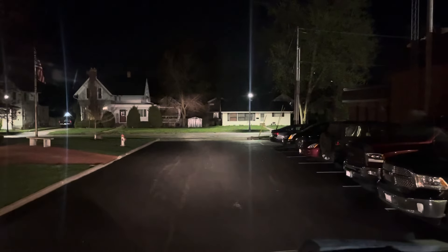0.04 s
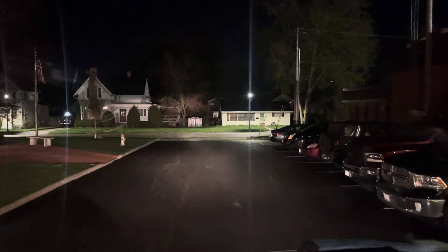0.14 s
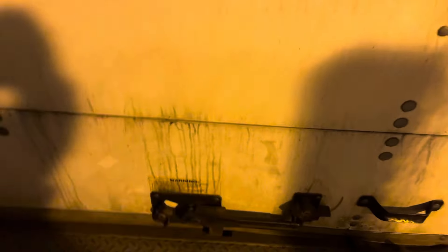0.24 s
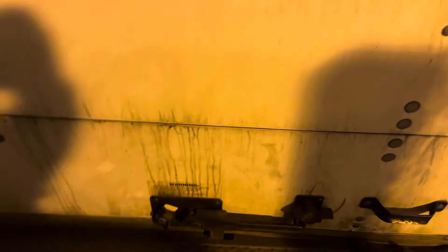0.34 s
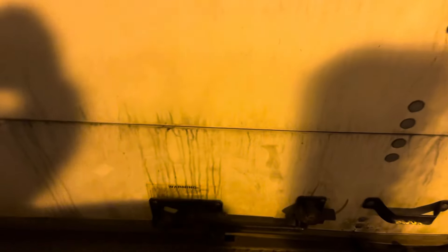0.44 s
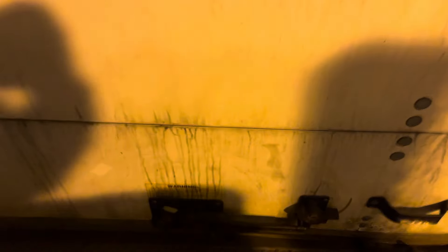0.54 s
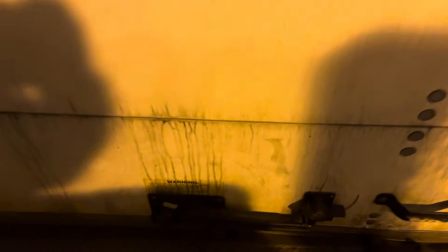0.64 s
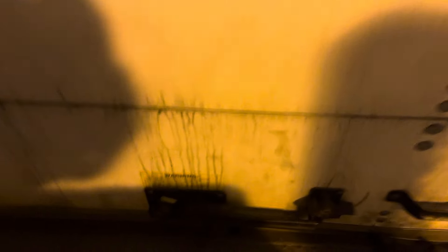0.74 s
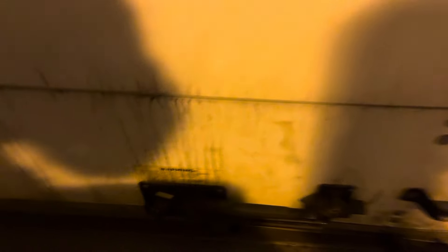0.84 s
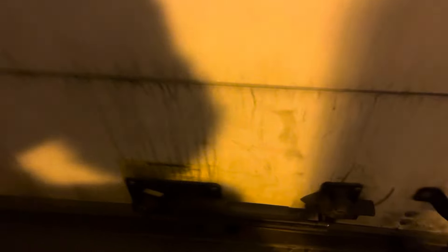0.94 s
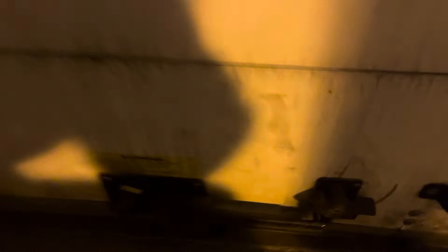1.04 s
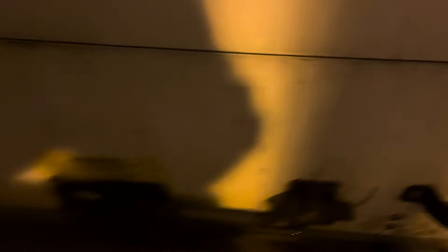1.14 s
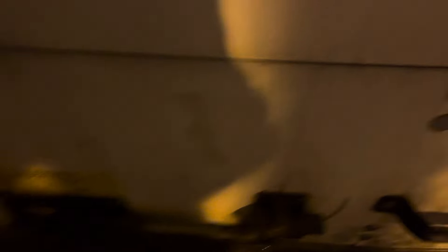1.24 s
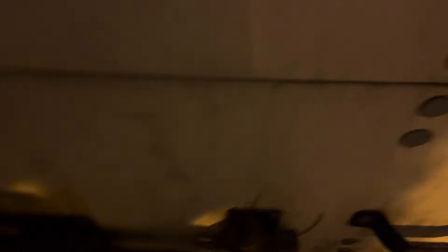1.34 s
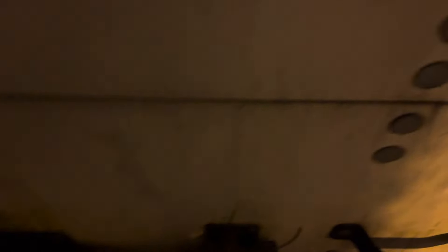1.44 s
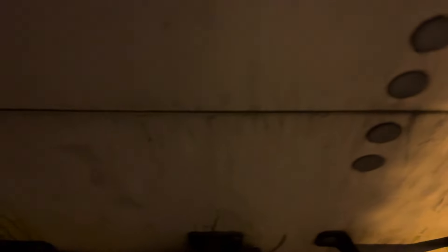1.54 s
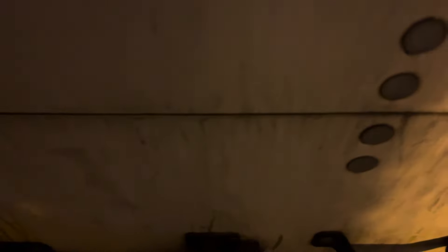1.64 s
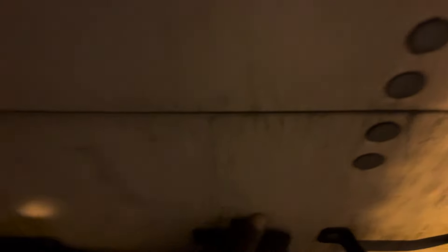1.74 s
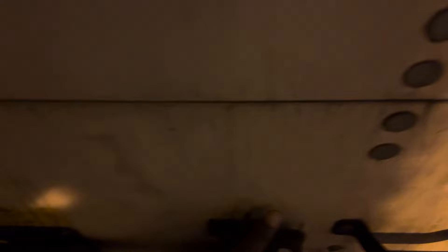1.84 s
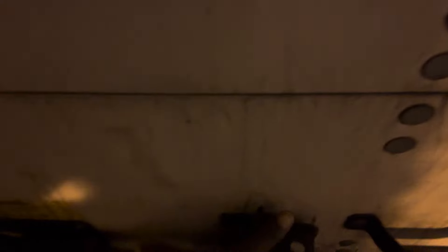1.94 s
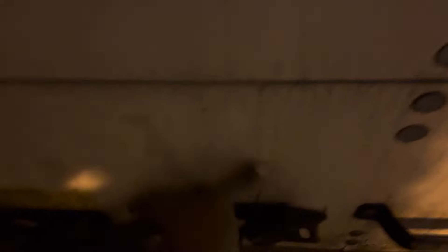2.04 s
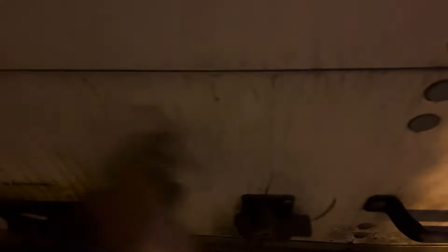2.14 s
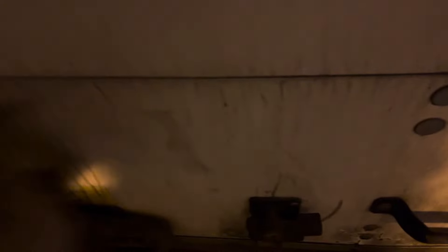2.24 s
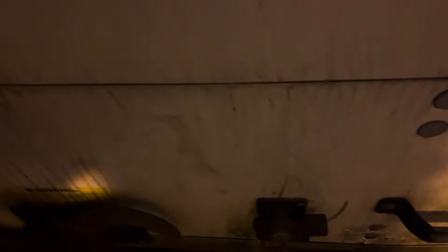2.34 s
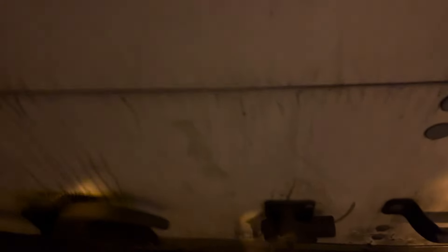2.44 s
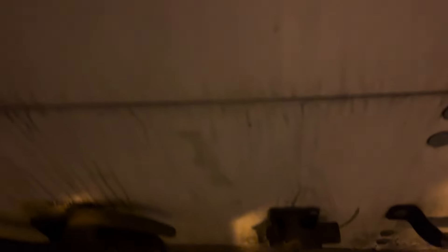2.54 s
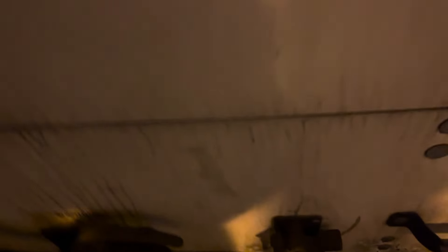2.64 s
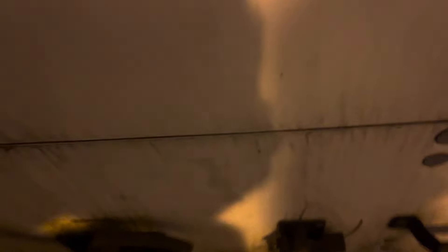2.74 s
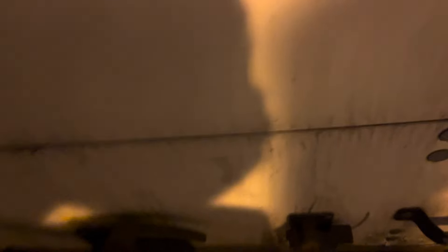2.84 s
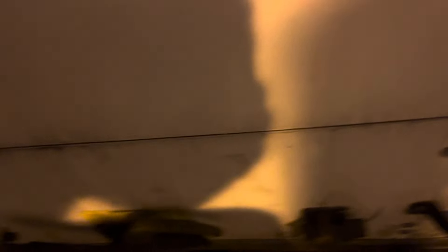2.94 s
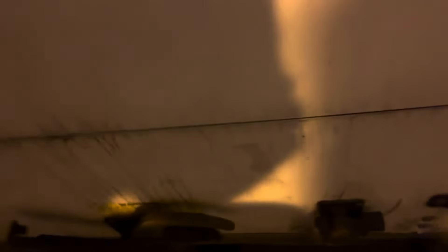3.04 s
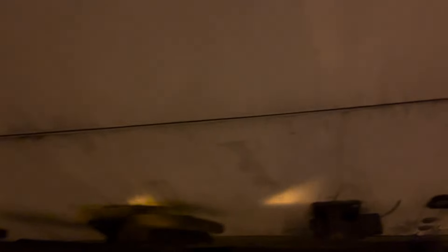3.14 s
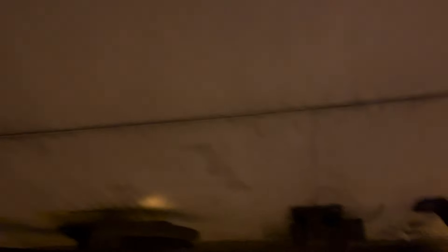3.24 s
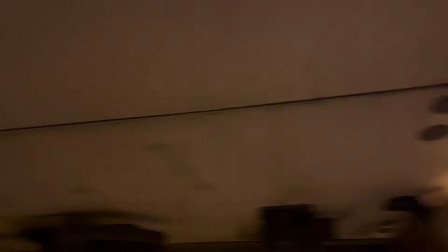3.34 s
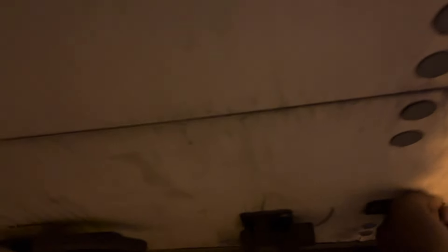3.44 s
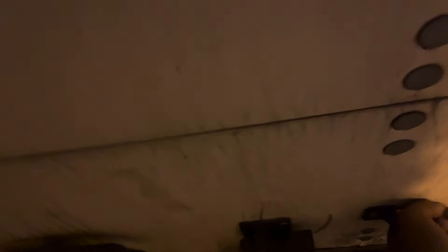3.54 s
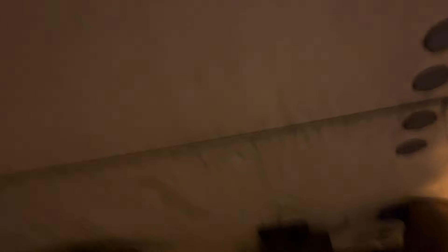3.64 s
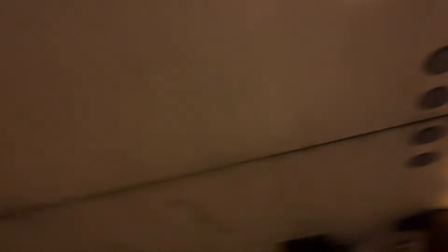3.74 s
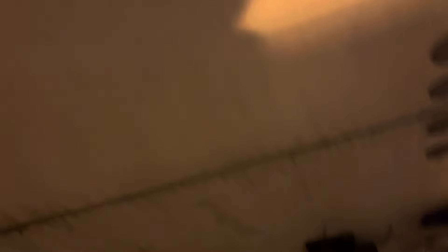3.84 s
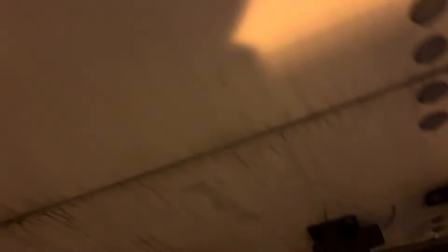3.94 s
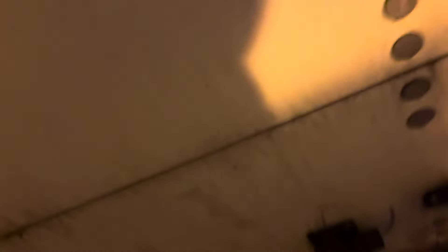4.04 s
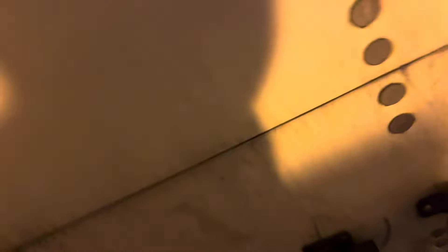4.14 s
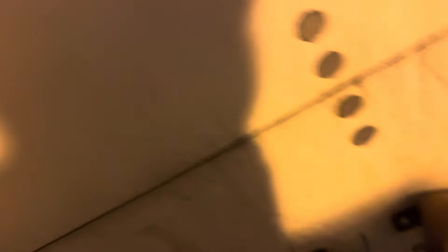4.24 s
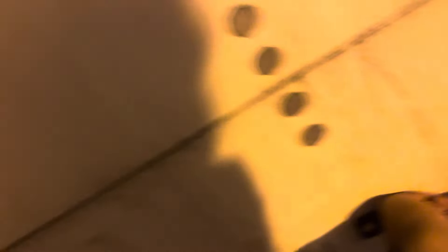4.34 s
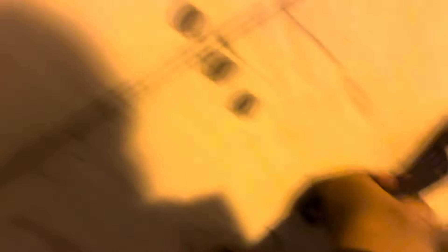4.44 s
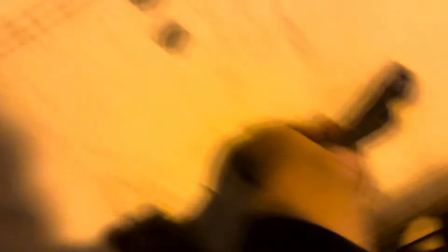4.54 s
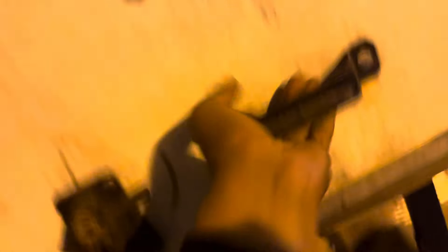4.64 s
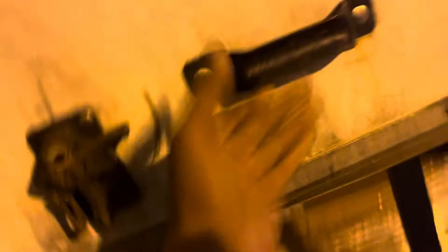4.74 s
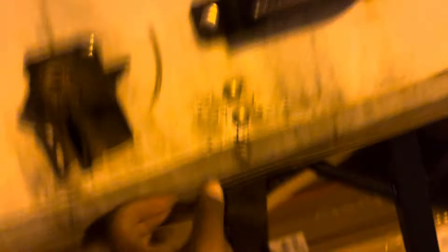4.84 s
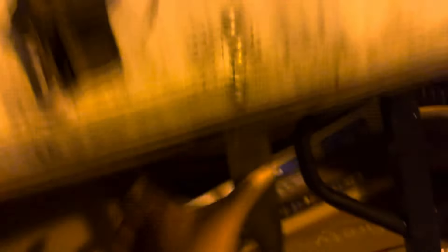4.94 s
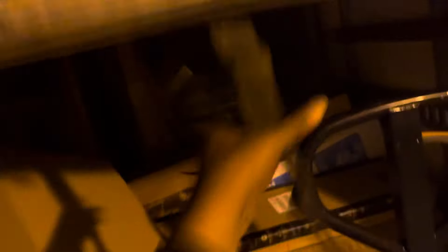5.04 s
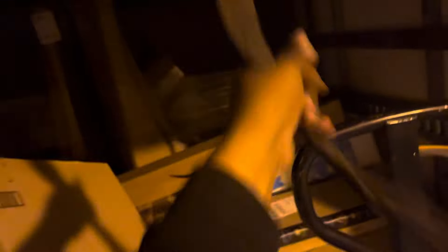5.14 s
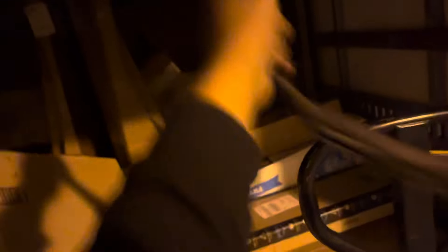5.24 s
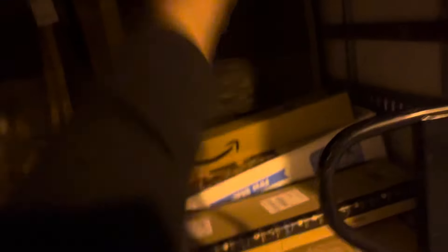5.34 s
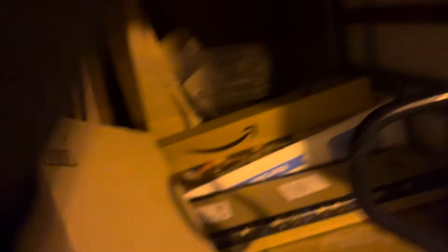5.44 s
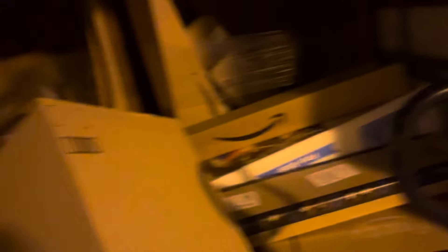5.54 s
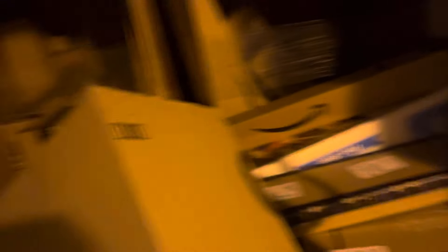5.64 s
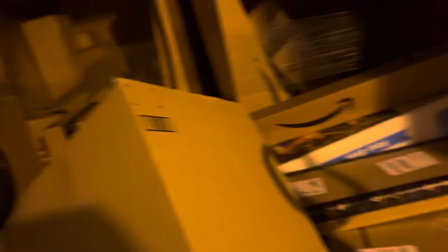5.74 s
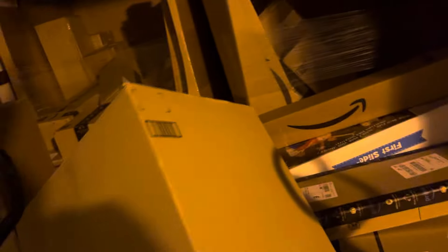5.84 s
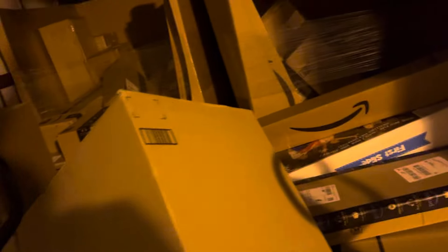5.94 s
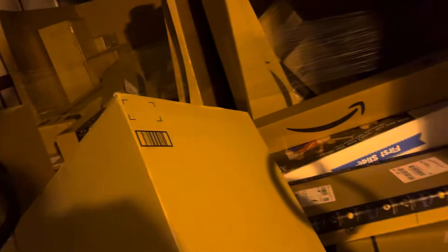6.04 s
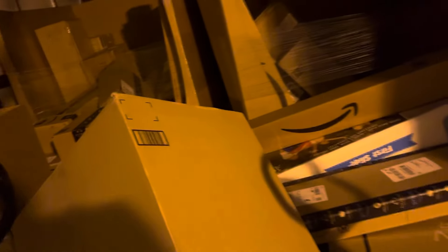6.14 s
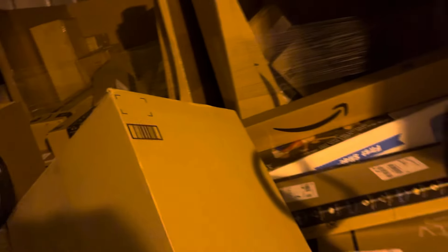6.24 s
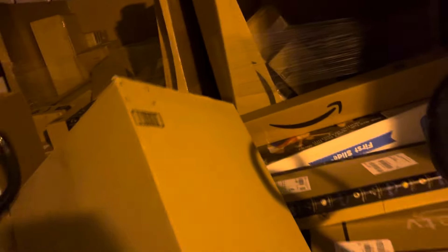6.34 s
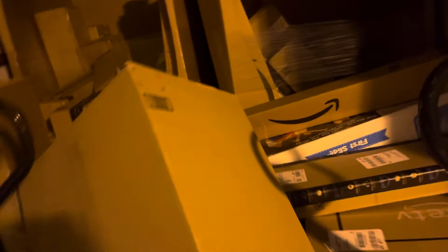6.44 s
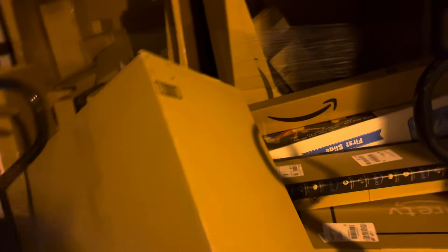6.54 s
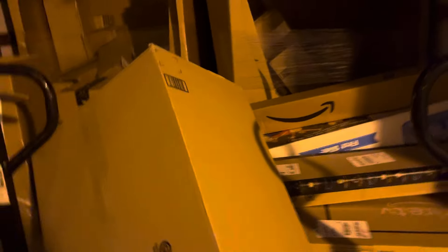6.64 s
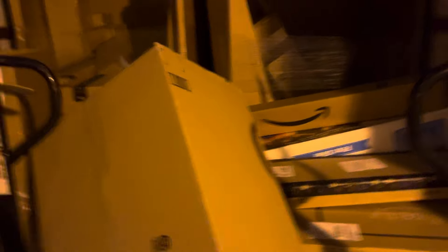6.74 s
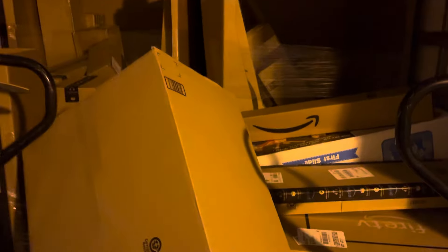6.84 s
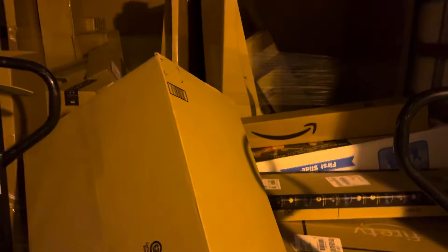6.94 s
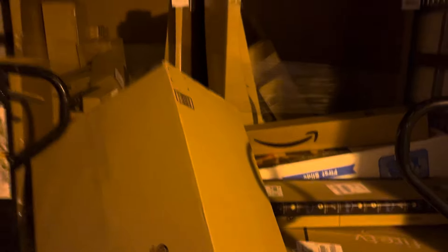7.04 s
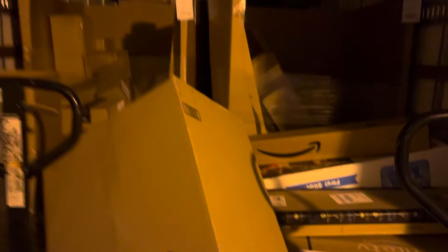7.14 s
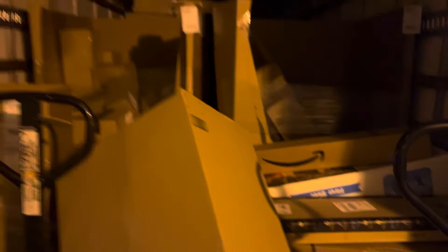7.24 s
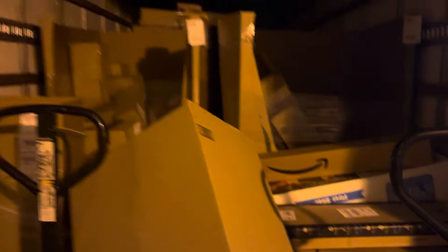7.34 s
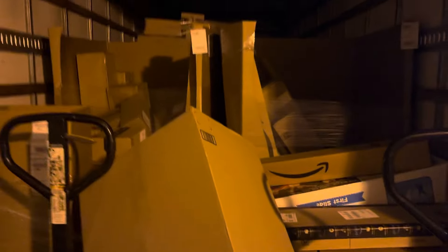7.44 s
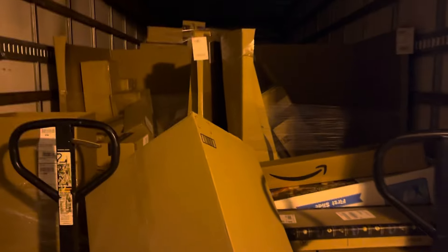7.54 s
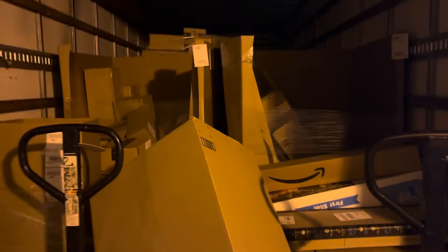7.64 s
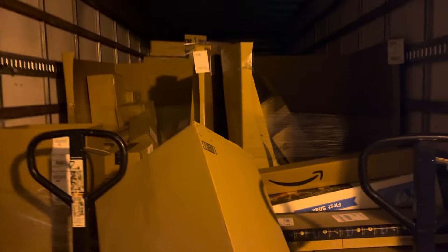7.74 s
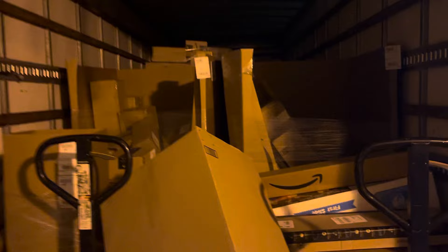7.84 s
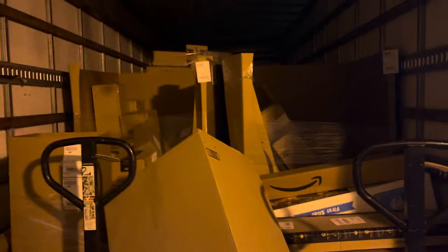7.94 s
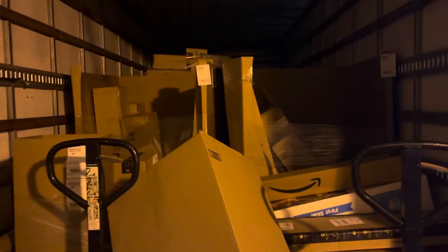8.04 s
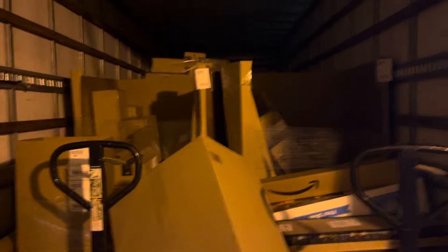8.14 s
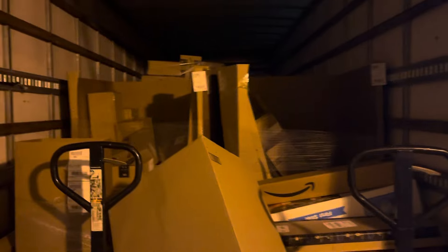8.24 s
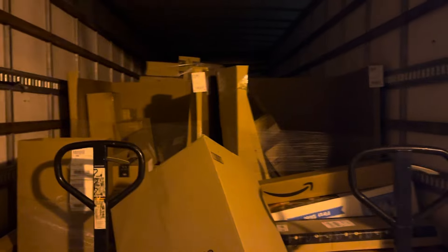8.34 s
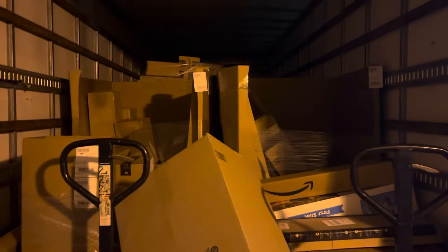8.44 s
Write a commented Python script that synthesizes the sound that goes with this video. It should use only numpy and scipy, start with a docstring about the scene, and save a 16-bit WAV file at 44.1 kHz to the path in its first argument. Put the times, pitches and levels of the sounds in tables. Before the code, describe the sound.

After a blink of idling cab hum, a steel latch clacks and squeaks loose, then a truck's roll-up door rattles and rumbles overhead to rest.

```python
"""Roll-up door of a box truck at night

A moment in the idling cab (hum and blower), then close behind the cargo door, the town a low noise far off.
The steel latch is worked loose: sharp clacks ring its plate, hook and handle, and its dry pivot squeaks.
The freed door jumps, and its panels roll up the tracks: jolted noise and short ringing hits rattle and drum
on the cargo box until they knock to rest overhead. Two microphone ports hear it, the right a moment later."""
import sys
import numpy as np
from scipy import signal
from scipy.fft import rfft, irfft
from scipy.io import wavfile
from scipy.ndimage import uniform_filter1d

SR = 44100
rng = np.random.default_rng(int(sys.argv[2]) if len(sys.argv) > 2 else 0)


def to_wav(sig):
    """Store sig (one row per channel, or 1-D mono) as 16-bit WAV at the path in sys.argv[1].

    Samples outside -1..1 are clipped; the rate is SR.
    """
    pcm = np.clip(np.atleast_2d(sig), -1, 1) * 32767
    pcm = np.round(pcm).astype(np.int16)
    wavfile.write(sys.argv[1], SR, pcm.T)  # frames by channels


N = 373659
TIME = np.arange(N) / SR


def undb(db):
    """Decibels to gain."""
    return np.exp(np.asarray(db) * np.log(10) / 20)


def curves(rows):
    """The columns of a table, joined by straight lines in time."""
    s, *columns = np.transpose(rows)
    return [np.interp(TIME, s, column) for column in columns]


def unit(x):
    """Scale to rms 1."""
    return x / np.sqrt(np.mean(x ** 2))


def attack_level(x, db):
    """Set the rms level of the first 20 ms."""
    return x * undb(db) / np.sqrt(np.mean(x[..., :SR // 50] ** 2))


def fade(t60, size=SR):
    """Exponential decay by 60 dB in t60 seconds."""
    return np.exp(-np.log(1000) * np.arange(size) / SR / max(t60, 1 / SR))


def add(out, s, x):
    """Mix a sound in at time s."""
    i = int(s * SR)
    out[:, i:i + x.shape[-1]] += x[..., :N - i]


def swell(s, length):
    """A smooth rise to 1 and fall around time s, `length` wide at half height."""
    u = np.linspace(-1.4, 1.4, 57)
    return np.interp(TIME, s + length * u, (1 - u ** 2 / 2) ** 5, left=0, right=0)


def step(s, ease):
    """A smooth change from 0 to 1 around time s."""
    return (1 + np.tanh(2 * (TIME - s) / ease)) / 2


def colour(x, points):
    """Causal filter through (f/Hz, level/dB) points, built from the cepstrum."""
    hz, db = np.transpose(points)
    f = np.maximum(np.fft.rfftfreq(4096, 1 / SR), 1)
    cepstrum = irfft(np.log(undb(np.interp(np.log(f), np.log(hz), db))))
    # folding the cepstrum puts the energy of the filter first
    half = len(cepstrum) // 2
    cepstrum[1:half] *= 2
    cepstrum[half + 1:] = 0
    impulse = irfft(np.exp(rfft(cepstrum)))
    return signal.oaconvolve(x, impulse[None], axes=-1)[:, :x.shape[-1]]


def resonate(x, hz, width):
    """One resonance, gain 1 at its centre."""
    return signal.lfilter(*signal.iirpeak(hz, hz / width, SR), x + 1e-18)


def high_pass(x, edge, damping):
    """Steep high-pass with a resonant edge that follows (t/s, f/Hz) rows."""
    f, t, spectra = signal.stft(x, SR, nperseg=1024)
    ratio = (f[:, None] / np.interp(t, *np.transpose(edge))) ** 3
    gain = ratio ** 2 / np.hypot(1 - ratio ** 2, damping * ratio)
    return signal.istft(spectra * gain, SR)[1][:, :N]


def noise(side_db, size=N):
    """Two-channel noise whose width is the level of side against middle."""
    mid, side = rng.standard_normal((2, size))
    return unit(mid + undb(side_db) * side * np.array([[1], [-1]]))


def jolts(per_s, spread_db, t60, steady):
    """Envelope of random impacts of unequal size over a steady share, held near rms 1."""
    size = undb(spread_db * np.clip(rng.standard_normal(N), -2, 2))
    impacts = (rng.random(N) < per_s / SR) * size ** 2
    energy = signal.lfilter([1], [1, -fade(t60, size=2)[1] ** 2], impacts)
    energy = energy + np.mean(energy) * steady
    return np.sqrt(energy / uniform_filter1d(energy, SR // 10))


def chatter(t60, side_db, hold_s=0.0043, per_s=220):
    """Loose parts meet in a run of separate contacts, ever more weakly."""
    t = np.arange(SR // 2) / SR
    contacts = (rng.random(len(t)) < per_s / SR) * (.5 + rng.random(len(t)))
    contacts[0] = 2
    grain = np.sqrt(signal.lfilter([1], [1, -np.exp(-3 * per_s / SR)], contacts) + .12)
    decay = np.exp(-np.log(1000) * np.maximum(t - hold_s, 0) / t60)
    return noise(side_db, size=len(t)) * grain * decay


def strike(t60, side_db):
    """A short strike and the weaker, dense shudder of the loose panels."""
    shudder = chatter(t60, side_db, per_s=450)
    return chatter(0.1, side_db) + undb(-5) * shudder


def ring(modes, db, tilt_db=0, near_hz=1000, focus_db=0):
    """Struck steel: tilt and focus (dB per octave) favour some modes; each mode wobbles as it rings."""
    hz, mode_db, t60 = np.transpose(modes)
    t = np.arange(SR // 2, dtype=np.float32) / SR
    turns = np.float32(hz)[:, None] * t + np.float32(rng.random((len(hz), 1)))
    wobble_hz = np.float32(rng.uniform(6, 24, (len(hz), 1)))
    wobble = 1 + np.cos(2 * np.pi * wobble_hz * t) / 2
    decay = np.exp(-np.float32(np.log(1000) / t60)[:, None] * t)
    tones = wobble * np.sin(2 * np.pi * turns) * decay
    octaves = np.log2(hz / near_hz)
    # the focus stops growing half an octave away; no two blows weigh the modes alike
    favour_db = tilt_db * octaves - focus_db * np.minimum(abs(octaves), .5)
    weights = undb(mode_db + favour_db + rng.standard_normal(len(hz)))
    return attack_level(np.float32(weights) @ tones, db)


# the town heard from behind the truck: f/Hz, level/dB
NIGHT = [(18, -51.5), (30, -19), (108, -3.5), (212, -6.5), (240, 0), (266, -12), (510, -16.5), (1230, -30),
         (2670, -31.5), (3430, -35.5), (4630, -43), (8880, -38.5), (12000, -62), (15600, -77),
         (22000, -120)]
TOWN_DB, TOWN_FALL_DB_PER_S = -53, 0.55
# hands, sleeves and the latch lever brush the door: t/s, length/s, level/dB
BRUSHES = [(.28, 0.26, -64.5), (.44, 0.15, -55.5), (0.835, 0.37, -60), (1.3, 0.49, -59),
           (1.483, 0.22, -75.5), (2.272, 0.077, -53.5), (1.75, 0.44, -52), (1.95, 0.13, -42.5),
           (2.448, 0.26, -52), (3.618, 0.11, -48.5), (6.56, 0.039, -37)]


def surroundings():
    """Slowly fading noise of the distant town, and grainy noise for the soft brushing at the door."""
    town = unit(colour(noise(-11.0), NIGHT)) * undb(TOWN_DB - TOWN_FALL_DB_PER_S * TIME)
    grains = noise(0) * jolts(per_s=400, spread_db=9.0, t60=.08, steady=1.5)
    cloth = [(300, -11.0), (1500, -1.0), (5000, -9.0), (9000, 0.5), (11000, -12.5)]
    brushing = unit(colour(grains, cloth))
    return town + brushing * sum(undb(db) * swell(s, length) for s, length, db in BRUSHES)


# blower inside the cab: f/Hz, level/dB
CAB = [(18, -50), (30, -7), (135, 0), (192, -1), (294, -1.5), (368, -10), (550, -9), (930, -14),
       (1320, -15.5), (3020, -25), (4630, -26.5), (5800, -34), (9340, -28.5), (10600, -82), (12000, -87),
       (15600, -117), (22000, -120)]
# engine orders heard in the cab: f/Hz, rms level/dB
CAB_HUM = [(89.8, -46.5), (134.6, -48), (224, -50)]
CAB_DB, CAB_END_S = -38.5, 0.222  # blower level; end of hum and blower


def cab():
    """Engine hum as steady sines and blower as coloured noise inside the cab, ending at once."""
    t = TIME[:SR // 2]
    hum = sum(undb(db) * np.sqrt(2) * np.sin(2 * np.pi * (hz * t + rng.random())) for hz, db in CAB_HUM)
    blower = unit(colour(noise(-6.5, size=len(t)), CAB)) * undb(CAB_DB)
    out = np.zeros((2, N))
    add(out, 0, (hum + blower) * np.clip((CAB_END_S - t) * 400, 0, 1))
    return out


# soft rustle once the door is still: f/Hz, level/dB
RUSTLE = [(300, -0.5), (1200, -2.5), (2500, -9), (5000, -5.5), (8500, 2.5), (9800, -4), (11500, -15.5)]
RUSTLE_S, RUSTLE_RISE_S, RUSTLE_T60_S, RUSTLE_DB = 8.088, 0.017, 0.45, -46


def rustle():
    """A soft hiss that rises quickly and dies away smoothly."""
    t = np.arange(SR) / SR
    shape = (1 - np.exp(-(t / RUSTLE_RISE_S) ** 2)) * fade(RUSTLE_T60_S)
    out = np.zeros((2, N))
    add(out, RUSTLE_S, unit(colour(noise(-3.5, size=SR), RUSTLE)) * shape * undb(RUSTLE_DB))
    return out


def cargo_box(x):
    """Dense echoes in the box and between the panels; the treble dies first."""
    low_colour = [(40, -19), (150, -11.0), (400, 0.5), (900, -12.0), (3000, -40.0)]
    mid_colour = [(200, -17.0), (700, -1.0), (1600, 2.5), (3000, -1.5), (7000, -29.5)]
    high_colour = [(1000, -28.0), (4000, 6.0), (9000, 4.0), (12000, -16.0)]
    low = colour(noise(-18, size=SR), low_colour) * fade(0.77)
    mid = colour(noise(-5.0, size=SR), mid_colour) * fade(0.82)
    high = colour(noise(-10.0, size=SR), high_colour) * fade(0.58)
    onset = 1 - fade(0.02)
    echoes = (undb(-38.5) * low + undb(-45.0) * mid + undb(-51.5) * high) * onset
    return signal.oaconvolve(x, echoes, axes=-1)[:, :N]


# resonances of the door panels: f/Hz, width/Hz, level/dB
DOOR = [(87.5, 5, 2), (181, 5.7, -5.5), (282, 28, -2.5), (390, 21, -17), (564, 85, -10.5), (965, 18, -7.5),
        (1330, 13, -1.5), (1830, 34, -6.5), (1960, 420, -16)]


def panels(x):
    """The door panels add their resonances to whatever shakes them."""
    return x + sum(undb(db) * resonate(x, hz, width) for hz, width, db in DOOR)


# knocks of the whole door: t/s, thump level/dB, panel level/dB, steel level/dB, shudder t60/s
KNOCKS = [(0.671, -47, -49.5, -77, 0.89), (.736, -38.5, -32.5, -54.5, 0.52), (1.073, -50.5, -54, -48, 0.78),
          (2.843, -47, -62, -67, 0.67), (2.9565, -28.5, -22, -56, 0.65), (3.3585, -55, -48.5, -51.5, 0.039),
          (3.738, -39, -49, -69, 0.52), (3.809, -33.5, -38.5, -62, 0.31), (4.0998, -39, -46, -55, 0.11),
          (4.518, -41, -24, -56, 0.31), (4.572, -39, -25, -48, .1), (4.698, -23, -20, -46, 0.091),
          (4.893, -40, -27, -40, .06), (4.922, -32, -21, -25.5, 0.11), (4.945, -29, -18.5, -34, 0.063),
          (5.0677, -41, -23, -24, 0.064), (5.156, -28, -18.5, -42, .08), (5.2555, -46, -23.5, -50, .2),
          (5.454, -36, -25, -38, 0.11), (5.572, -56, -41.5, -40, 0.14), (6.2208, -63, -43.5, -41, 0.24),
          (6.574, -62, -40, -28.5, 0.57), (6.6137, -46, -30, -24.5, 0.43), (6.622, -44, -24, -45, .2),
          (6.655, -48, -29.5, -56, 0.22), (7.002, -34.5, -32.5, -23.5, 0.48),
          (7.038, -37.5, -35.5, -36.5, 0.16), (7.075, -37.5, -38, -54, 0.15),
          (7.141, -43, -43.5, -49.5, 0.13), (7.412, -71, -58, -57.5, 0.97), (7.4319, -58, -55, -62.5, .3),
          (7.445, -61, -52, -70, 0.33)]
# colour of the door's thump, also under the latch: f/Hz, level/dB
THUMP = [(30, -30), (70, -11), (130, -3.5), (250, -3), (400, -5.5), (600, -6.5), (1200, -21), (4000, -66.5)]
# colour of the knocked panels: f/Hz, level/dB
PANEL = [(150, -36), (400, -12.5), (700, -4.5), (1300, 0), (2100, -5), (3200, -16), (5000, -34.5),
         (10000, -62.5)]
# colour of the steel tracks, knocked or rolled on: f/Hz, level/dB
TRACK = [(1650, -6), (2800, 0.5), (3670, -2.5), (3990, -5), (4170, -5), (5150, -4), (5600, -5),
         (7060, -4.5), (9190, 3), (9800, -6.5), (10200, -32), (11700, -5.5), (13000, -39.5)]


def knocks():
    """The door knocks, shut, rolling or coming to rest: a thump, a shuddering panel and a knock of track steel."""
    out = np.zeros((2, N))
    for s, thump_db, panel_db, steel_db, t60 in KNOCKS:
        add(out, s, attack_level(colour(chatter(1.25 * t60, side_db=-12), THUMP), thump_db))
        add(out, s, attack_level(colour(strike(t60, side_db=-3), PANEL), panel_db))
        add(out, s, attack_level(colour(strike(0.73 * t60, side_db=-35), TRACK), steel_db))
    return out


# hollow bumps of hands and slack panels: t/s, f/Hz, peak level/dB, t60/s
BUMPS = [(0.739, 1314, -32, 0.19), (1.189, 600, -32, 0.0055), (1.997, 245, -18.5, 0.07),
         (2.021, 167.6, -25, 0.24), (2.342, 392, -27, 0.11), (2.66, 416, -41.5, 0.14),
         (2.975, 173, -26, 0.33), (2.99, 127.2, -30, .35), (3.1, 392, -33.5, 0.28),
         (4.333, 593, -21.5, 0.07), (4.542, 293, -24, 0.11), (4.595, 198, -11, 0.04),
         (4.625, 201, -21, 0.045), (4.793, 410, -12.5, .06), (4.843, 437, -17, 0.07),
         (4.941, 211.3, -15, 0.083), (5.022, 311, -15.5, 0.086), (5.094, 218.6, -17, .06),
         (5.307, 207, -15, 0.054), (5.610, 203, -24, 0.075), (5.776, 182, -37, 0.049),
         (5.957, 169, -39, 0.064), (6.171, 171.9, -26, 0.45), (6.618, 517, -24, .06)]


def bumps():
    """Soft contacts on hollow panels: each is one decaying tone with a rounded start."""
    out = np.zeros((2, N))
    t = np.arange(SR) / SR
    for s, hz, db, t60 in BUMPS:
        soft_contact = 1 - np.exp(-(t * hz / 3.1) ** 2)
        tone = soft_contact * fade(t60) * np.sin(2 * np.pi * hz * t)
        add(out, s, undb(db) * tone / np.max(tone))
    return out


# the dry pivot squeaks: t/s, f/Hz, level/dB
SQUEAK = [(1.856, 2210, -55), (1.870, 2194, -31.5), (1.878, 2030, -10), (1.882, 2070, -20.5),
          (1.889, 2045, -8.5), (1.896, 2020, -22), (1.908, 1975, -34.5), (1.945, 2075, -45)]
# harmonics 1-4 of the squeak: level/dB
SQUEAK_DB = [-0.5, 0.5, -16, -9.5]
# the hook judders out of its catch: t/s, f/Hz, level/dB
JUDDER = [(1.652, 632, -53.5), (1.664, 645, -15), (1.682, 617, -19.5), (1.70, 644, -34.5),
          (1.735, 615, -39)]
# harmonics 1-3 of the judder: level/dB
JUDDER_DB = [-3.5, -17.5, -10]


def stick_slip(rows, harmonics_db, rough):
    """Dry steel catching and slipping; the lighter the pressure, the more pitch and level stumble."""
    s, hz, db = np.transpose(rows)
    t = np.arange(s[0], s[-1], 1 / SR)
    level_db = np.interp(t, s, db)
    # a low level stands for light pressure
    slack = 0.5 + (db.max() - level_db) / 20
    waver, flutter = unit(uniform_filter1d(rng.standard_normal((2, len(t))), SR // 700))
    pitch_hz = np.interp(t, s, hz) * (1 + rough * slack * waver)
    phase = 2 * np.pi * np.cumsum(pitch_hz) / SR
    tone = sum(undb(d) * np.sin((k + 1) * phase) for k, d in enumerate(harmonics_db))
    out = np.zeros((2, N))
    add(out, s[0], unit(tone) * undb(level_db + slack * flutter))
    return out


# latch clacks: t/s, door thump level/dB, latch plate level/dB, steel crack level/dB, plate pitch f/Hz,
# chatter t60/s, hook ring level/dB, handle ring level/dB, handle pitch f/Hz
CLACKS = [(1.4216, -45.5, -37.5, -55, 1533, 0.094, -70.5, -59.5, 4120),
          (1.431, -35.5, -21, -36.5, 1600, 0.042, -54.5, -37.5, 4050),
          (1.436, -38, -28, -42.5, 1700, 0.033, -53.5, -39.5, 4600),
          (1.461, -43.5, -37.5, -53.5, 1650, 0.14, -72, -66.5, 4117),
          (1.6356, -41.5, -43, -60.5, 1874, 0.042, -76, -71.5, 4110),
          (1.6626, -29.5, -25.5, -49, 1756, 0.042, -58, -58, 4145),
          (1.674, -32, -18.5, -39, 1780, 0.091, -40.5, -51.5, 8200),
          (1.724, -40, -29, -51, 1367, 0.075, -67.5, -66, 8200),
          (1.7344, -32.5, -15.5, -29.5, 1303, 0.034, -24, -30.5, 9020),
          (1.739, -27.5, -17, -32, 1600, 0.036, -30.5, -36.5, 8420),
          (1.974, -40.5, -26, -44.5, 3135, 0.12, -57.5, -47, 4123),
          (1.9930, -19, -17, -12.5, 2018, 0.072, -25, -26.5, 7990),
          (2.013, -28, -18.5, -40.5, 1369, 0.11, -52.5, -45, 4070),
          (2.029, -31.5, -20.5, -39, 1672, 0.028, -51, -46, 4146),
          (2.0982, -45.5, -17, -32, 1385, 0.018, -40, -33, 4085),
          (2.1440, -42.5, -13, -33, 1312, 0.027, -20, -37.5, 8360),
          (2.151, -43, -18.5, -36, 1297, 0.019, -32, -43.5, 8460),
          (2.197, -27, -26.5, -44, 1772, 0.03, -39, -57.5, 4100),
          (2.332, -42, -19, -20, 1960, 0.047, -45, -21.5, 8210),
          (2.3462, -39, -19.5, -38.5, 786, 0.042, -52.5, -38, 5300),
          (2.4234, -30, -17, -24.5, 900, 0.078, -53.5, -15.5, 7700),
          (2.4369, -30, -24, -24, 782, 0.033, -49.5, -20.5, 2150),
          (2.447, -39.5, -25, -37, 2130, 0.062, -53.5, -37, 8070),
          (2.528, -40, -18, -24.5, 1150, 0.024, -47, -25.5, 8600),
          (2.5335, -37.5, -19.5, -37, 815, 0.094, -57, -33.5, 5740),
          (2.576, -49.5, -28.5, -52, 797, 0.099, -64, -53, 6860),
          (2.9565, -36, -25, -60, 1510, 0.11, -62, -53, 2900)]
# modes of the steel hook: f/Hz, level/dB, t60/s
HOOK = [(3878, -3, .09), (3902, -17, .7), (5455, -12, .13), (7385, -11.5, .26), (7795, -1, .12),
        (9452, -.5, .12), (10620, -10, .14), (11340, -12, .1)]
# modes of the steel handle: f/Hz, level/dB, t60/s
HANDLE = [(1448, -13, .3), (1585, -11, .6), (2150, -3, .08), (2902, -10, .2), (4075, 1, .04),
          (4650, -1, .025), (4890, -13, .25), (5290, -2, .2), (6125, -11, .25), (6560, -14, .45),
          (6837, 2, .13), (7330, -3, .08), (7660, -6, .05), (7815, -5, .14), (8090, 2, .1), (8400, -1, .1),
          (9211, -3, .13), (9970, -7, .07), (10930, -7, .09)]
# resonances of the latch plate on its panel: f/Hz, width/Hz, level/dB
PLATE = [(430, 34, 5), (654, 45, -7.5), (754, 110, 6), (890, 130, 8), (1281, 77, 8), (1552, 180, 5.5),
         (1750, 45, 9.5), (1920, 60, 4.5), (2050, 69, 2), (2170, 97, 4.5), (2460, 74, 5), (2934, 55, 0.5),
         (3100, 70, 0.5), (3700, 110, -4.5)]
# colour of cracking steel, also of the roller clicks: f/Hz, level/dB
CRACK = [(1500, -20), (3000, -4.5), (4100, -7), (5200, -11.5), (6400, -9), (7800, -8), (9300, -2),
         (10300, -8), (12000, -15.5), (15000, -39.5)]


def latch():
    """Each clack cracks, rings the plate, thumps the door and leaves hook and handle singing."""
    out = np.zeros((2, N))
    crack_balance = undb(np.array([[.5], [-.5]]))
    for s, thump_db, plate_db, crack_db, centre_hz, t60, hook_db, handle_db, handle_hz in CLACKS:
        contact = chatter(t60, side_db=-5.0)
        plate = 0
        for hz, width, db in PLATE:
            # the place of the blow favours the plate resonances near one pitch
            weight_db = db - 19 * abs(np.log2(hz / centre_hz))
            plate = plate + undb(weight_db) * resonate(contact, hz, width)
        add(out, s, attack_level(plate, plate_db))
        crack = colour(chatter(t60, side_db=-17.5), CRACK)
        add(out, s, attack_level(crack, crack_db) * crack_balance)
        thump = colour(chatter(2.8 * t60, side_db=-12.5), THUMP)
        add(out, s, attack_level(thump, thump_db))
        add(out, s, ring(HOOK, hook_db))
        add(out, s, ring(HANDLE, handle_db, near_hz=handle_hz, focus_db=34.5))
    return out


CLATTER_START_S, CLATTER_END_S = 4.3, 5.6
CLATTER_SHARE = .7  # share of the power that rings as separate hits in the middle of the clatter


def clatter(wash, low_hz, high_hz, count):
    """At speed, part of the wash breaks into hits on hinges and panel edges, each ringing at its own pitch."""
    hits = np.zeros((2, N))
    t = np.arange(SR // 14) / SR
    span_s = CLATTER_END_S - CLATTER_START_S
    for when, pitch, size, side in rng.random((count, 4)):
        hz = low_hz * (high_hz / low_hz) ** pitch
        t60 = min(36 / hz, .07)  # at most 36 cycles
        tone = np.sin(2 * np.pi * hz * t) * fade(t60, size=len(t)) * np.sqrt(hz / t60)
        gains = 1 + (side - .5) * np.array([[1], [-1]])
        # a few hits are much stronger than the rest
        add(hits, CLATTER_START_S + when * span_s, tone * gains * undb(-2.5 * np.log(size + .03)))
    # hits and wash are equally strong within the band of the hits
    band_share, time_share = 2 * (high_hz - low_hz) / SR, span_s * SR / N
    hits *= np.sqrt(band_share * time_share) / np.sqrt(np.mean(hits ** 2))
    share = CLATTER_SHARE * np.sin(np.pi * np.clip((TIME - CLATTER_START_S) / span_s, 0, 1))
    return np.sqrt(1 - share) * wash + np.sqrt(share) * hits


# rollers and hinges clink over the track joints: t/s, click level/dB, ring level/dB, ring tilt/dB per octave
CLINKS = [(4.724, -29.5, -29, -9.5), (4.744, -23.5, -21, 4), (4.899, -32.5, -30, 17.5),
          (4.929, -24.5, -40.5, -1.5), (5.047, -20, -35.5, 28), (5.093, -30.5, -40.5, -1),
          (5.1522, -22.5, -13, -0.5), (5.4693, -31, -39, -12), (5.967, -41.5, -41, 2)]


def clinks():
    """Rollers click over the joints and shake the loose hook that rides on the door."""
    out = np.zeros((2, N))
    for s, click_db, ring_db, tilt_db in CLINKS:
        add(out, s, attack_level(colour(chatter(0.03, side_db=-20.0), CRACK), click_db))
        add(out, s, ring(HOOK, ring_db, tilt_db=tilt_db) * fade(.25, size=SR // 2))
    return out


# how hard the door runs, as the level of its rollers: t/s, level/dB
RUN = [(3.53, -81), (3.72, -55.5), (3.83, -48.5), (4.48, -31.5), (4.54, -22.5), (4.87, -26), (5.1, -23.5),
       (5.23, -30.5), (5.46, -31), (5.8, -37.5), (6.0, -44.5), (6.2, -53.5), (6.26, -44), (6.62, -31),
       (6.86, -44.5), (7.08, -41.5), (7.26, -55), (7.75, -66)]
# the door lurches and swells: t/s, length/s, extra boom level/dB, extra rattle, rumble and hiss level/dB
LURCHES = [(3.807, 0.012, 12, 5), (4.027, 0.39, 12.5, 5.5), (4.651, 0.072, 15, 1.5), (4.756, 0.096, 6.5, 4),
           (4.924, 0.092, 7, 4), (5.095, 0.22, 9, 4.5), (5.289, 0.052, 10, 5.5), (5.445, 0.16, 5, 5),
           (5.631, 0.13, 14, 4.5), (5.8, 0.11, 8, 2.5), (6.24, 0.16, 20, 6.5), (6.925, 0.23, 20.5, 0),
           (7.083, 0.27, 1, 5), (7.531, 0.14, -6, 4)]
# the rattle and the rumble thin out and fill again: t/s, lower edge f/Hz
RATTLE_EDGE = [(3.5, 1647), (3.798, 576), (4.62, 570), (4.8, 393), (4.97, 283), (5.451, 290), (5.6, 1550),
               (5.78, 1080), (5.95, 2650), (6.13, 3770), (6.27, 2200), (6.38, 1400), (6.5, 650),
               (6.66, 400), (7.0, 240), (7.2, 490)]
FULL_RUN_DB = -23.5  # roller level at full speed
BOOM_DB, RUMBLE_DB, HISS_DB = -44, -35, -31.5  # box boom, panel rumble and track hiss at full speed
BOOM_SLOPE, RUMBLE_SLOPE, HISS_SLOPE = 0.69, 0.73, 0.64  # dB they lose for each dB of the rollers
# extra drumming while the panels fold through the curve of the track
BEND_START_S, BEND_END_S, BEND_EASE_S, BEND_BOOM_DB, BEND_RUMBLE_DB = 4.58, 5.5, 0.027, 13.5, 4.5
# once the door lies overhead the tracks hiss less
OVERHEAD_S, OVERHEAD_EASE_S, OVERHEAD_HISS_DB = 6.42, 0.17, -14
# the rumble fades as the lower edge of the rattle rises
THIN_FROM_HZ, THIN_DB_PER_OCTAVE = 1070, 7.5


def door_levels():
    """Boom, rumble, rollers and hiss in dB: all follow the run and lurches of the door, some also its path."""
    run_db = curves(RUN)[0]
    effort = run_db - FULL_RUN_DB
    bend = step(BEND_START_S, BEND_EASE_S) - step(BEND_END_S, BEND_EASE_S)
    swells = np.array([swell(s, length) for s, length, _, _ in LURCHES])
    heave, shake = np.transpose(LURCHES)[2:] @ swells
    thinning = np.maximum(np.log2(curves(RATTLE_EDGE)[0] / THIN_FROM_HZ), 0)
    overhead = step(OVERHEAD_S, OVERHEAD_EASE_S)
    boom = BOOM_DB + BOOM_SLOPE * effort + BEND_BOOM_DB * bend + heave
    rumble = RUMBLE_DB + RUMBLE_SLOPE * effort + BEND_RUMBLE_DB * bend + shake
    rumble -= THIN_DB_PER_OCTAVE * thinning
    hiss = HISS_DB + HISS_SLOPE * effort + shake + OVERHEAD_HISS_DB * overhead
    return boom, rumble, run_db + shake, hiss


# boom of the cargo box: f/Hz, level/dB
BOOM = [(25, -35), (45, -35.5), (65, -10.5), (100, -3.5), (150, 6.5), (190, 3), (240, 4.5), (330, -31.5),
        (700, -55.5)]
# rumble of the panels: f/Hz, level/dB
RUMBLE = [(100, -39.5), (200, -21), (270, 1.5), (380, 5.5), (500, -1), (650, -18), (1200, -51.5)]
# rattle of the panels: f/Hz, level/dB
RATTLE = [(200, -29.5), (450, -2.5), (610, -3), (760, 2), (1250, -0.5), (2100, -2), (2900, -11.5),
          (4200, -17.5), (7000, -34.5)]


def rolling():
    """Rollers jolt along the steel tracks; each jolt shakes the panels, which drum on the box."""
    boom_db, rumble_db, roller_db, hiss_db = door_levels()
    # a slow door runs smoothly, a fast one clatters
    speed = np.clip((roller_db + 21.0) / 20, 0, 1)
    rollers = 1 + (.35 + .55 * speed) * (jolts(per_s=70, spread_db=3, t60=.055, steady=.25) - 1)
    grit = jolts(per_s=580, spread_db=-1.5, t60=0.028, steady=7.0)

    drumming = panels(clatter(noise(-16.0) * rollers, low_hz=90, high_hz=895, count=260))
    boom = unit(colour(drumming, BOOM)) * undb(boom_db)
    rumble = unit(colour(drumming, RUMBLE))
    # part of the rumble passes below the lower edge of the rattle
    rumble = high_pass(rumble, RATTLE_EDGE, damping=0.5) + undb(-3) * rumble

    shaken = clatter(noise(-3.5) * rollers, low_hz=397.6, high_hz=4014, count=1100)
    full = colour(panels(shaken), RATTLE)
    thin = high_pass(full, RATTLE_EDGE, damping=0.52)
    # the panels keep one note while the rattle thins
    rattle = thin + undb(-14) * full + undb(4.5) * resonate(full, 602, 91)
    rattle /= np.sqrt(uniform_filter1d(np.mean(rattle ** 2, axis=0), SR // 5))
    hiss = unit(colour(noise(-8.5) * rollers * grit, TRACK)) * undb(hiss_db)

    out = boom + rumble * undb(rumble_db) + rattle * undb(roller_db + 2.0) + hiss
    out *= np.interp(TIME, [3.4, 3.55, 7.6, 7.8], [0, 1, 1, 0])
    return (out + clinks()) * undb(np.array([[-.2], [.2]]))


# the bass drops out briefly: t/s, length/s, rise of the lower edge f/Hz
BASS_DIPS = [(0.925, 0.52, 355), (3.424, 0.69, 142), (4.266, 0.32, 143.6), (6.037, 0.73, 130),
             (6.456, 0.16, 135)]
BASS_EDGE_HZ = 19  # lower edge of the sound between the dips


def bass_dips(x):
    """The lower edge of the sound rises in an arch and sinks back."""
    t = TIME[::SR // 100]
    arches = [hz * np.maximum(1 - (2 * (t - s) / length) ** 2, 0) for s, length, hz in BASS_DIPS]
    edge_hz = BASS_EDGE_HZ + sum(arches)
    return high_pass(x, np.column_stack([t, edge_hz]), damping=1.1)


# the sound turns briefly hollow: t/s, length/s, centre f/Hz, width/octaves, depth/dB
HOLLOWS = [(1.5, 0.13, 900, 1.1, 6), (1.84, 0.12, 880, 0.68, 19), (1.6, 0.18, 1200, .3, 4),
           (3.7, 0.19, 420, 0.81, 17), (3.5, 0.3, 1250, 1.07, 15), (4.617, 0.17, 457, 0.44, 13),
           (4.77, 0.11, 275, 0.42, 23.5), (5.69, 0.44, 340, 0.43, 25), (5.63, 0.17, 970, 0.8, 15),
           (6.04, 0.35, 337, 0.77, 32), (6.022, 0.49, 940, 1.28, 8.5)]


def hollows(x):
    """Bands around chosen pitches sink and come back, so the sound turns briefly hollow."""
    f, t, spectra = signal.stft(x, SR, nperseg=2048)
    octave = np.log2(np.maximum(f, 1))[:, None]
    cut_db = 0
    for s, length, hz, width, db in HOLLOWS:
        band = np.exp(-(2 * (octave - np.log2(hz)) / width) ** 2)
        moment = np.exp(-(2 * (t - s) / length) ** 4)
        cut_db = cut_db + db * band * moment
    return signal.istft(spectra * undb(-cut_db), SR)[1][:, :N]


# balance as the microphone swings about near the door: t/s, left minus right level/dB
SWING = [(.6, 0), (1.2, 0.5), (1.75, 2), (2.2, 0.5), (2.7, -0.2), (3.2, 1), (4.2, -0.5), (5.2, 1),
         (7.1, 0.5)]


def scene():
    """Latch and door close by, in front of the cargo box; cab, town and rustle around them."""
    clacks = latch() + stick_slip(JUDDER, JUDDER_DB, rough=0.042)
    squeak = stick_slip(SQUEAK, SQUEAK_DB, rough=0.02)
    # the small pivot shakes the box less than the blows do
    echoes = cargo_box(clacks + undb(-10) * squeak)
    knocking = undb(-1.5) * panels(knocks() + bumps())
    door = clacks + squeak + echoes + knocking + rolling()
    balance = undb(curves(SWING)[0] * np.array([[.5], [-.5]]))
    return hollows(bass_dips(door * balance + cab() + surroundings() + rustle()))


# colour of the two microphone ports: f/Hz, left minus right level/dB
PORTS = [(60, -2.5), (130, 0), (250, -0.9), (600, -2.5), (1100, -2.5), (2200, -2), (4000, 2.5),
         (8000, -0.35)]
# colour common to both ports: f/Hz, level/dB
MICROPHONE = [(100, -2.5), (9500, -1.5), (10100, -13), (11500, -7.5), (12800, -29.5), (15000, -25)]
TOP_HZ = 15800  # upper limit of the microphone


def record(dry):
    """Two ports of slightly different colour, the right one a moment later; the top octave is weak."""
    lag_samples = 1.116
    taps = np.arange(-8, 9)
    delay = np.sinc(taps - lag_samples) * np.hanning(len(taps))
    left = colour(dry[:1], [(hz, db / 2) for hz, db in PORTS])[0]
    right = colour(dry[1:], [(hz, -db / 2) for hz, db in PORTS])[0]
    right = np.convolve(right, delay, "same")
    ports = colour(np.array([left, right]), MICROPHONE)
    top_cut = signal.ellip(8, .2, 70, TOP_HZ, fs=SR, output="sos")
    return signal.sosfilt(top_cut, np.clip(ports, -1, 1))


dry = scene()
out = record(dry)
to_wav(out)
```